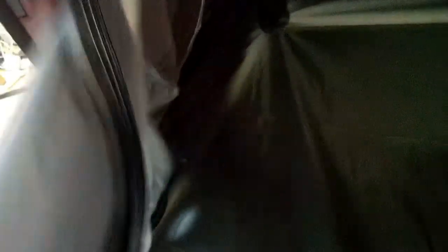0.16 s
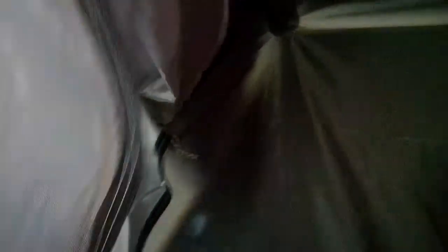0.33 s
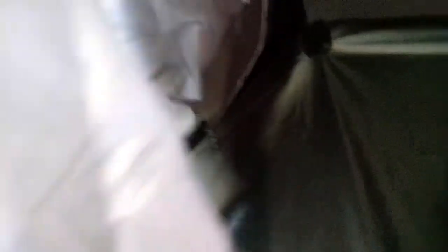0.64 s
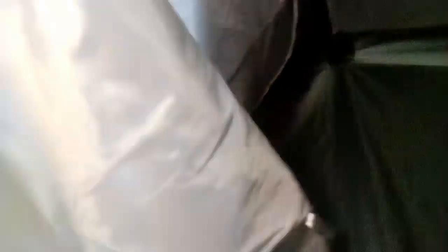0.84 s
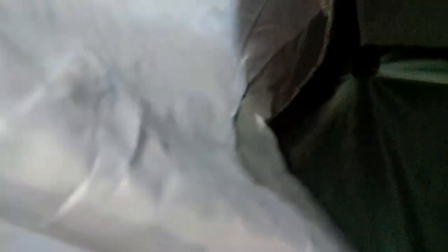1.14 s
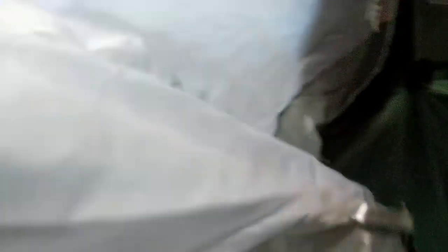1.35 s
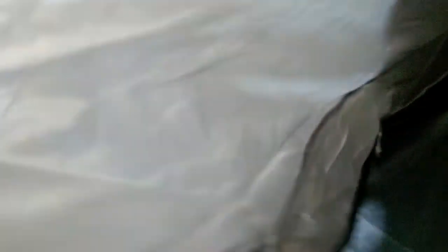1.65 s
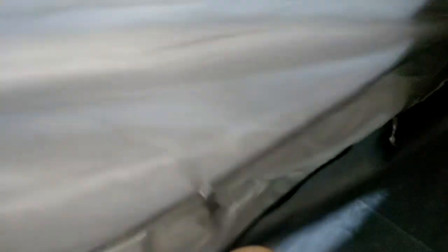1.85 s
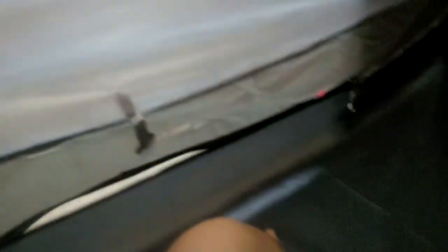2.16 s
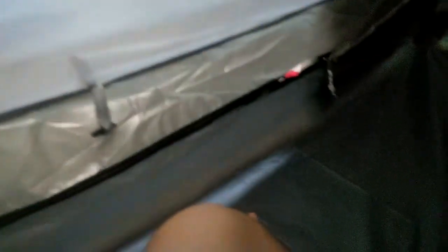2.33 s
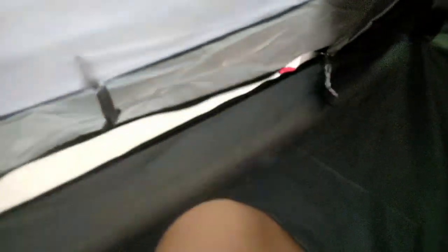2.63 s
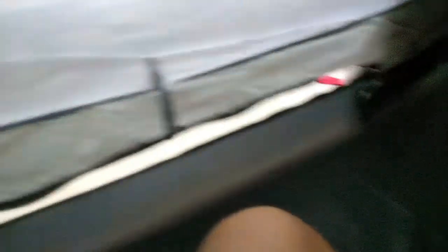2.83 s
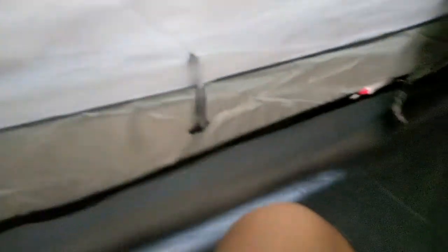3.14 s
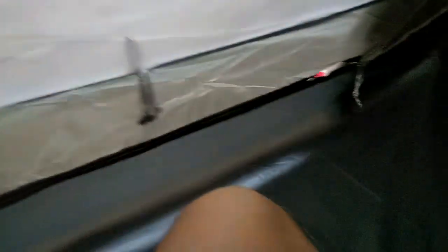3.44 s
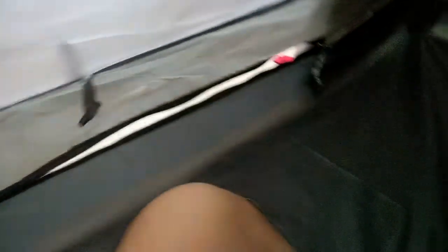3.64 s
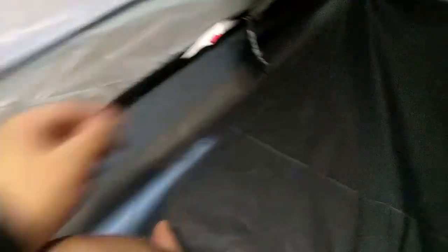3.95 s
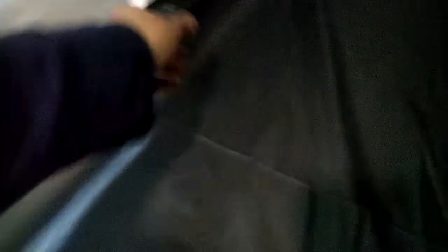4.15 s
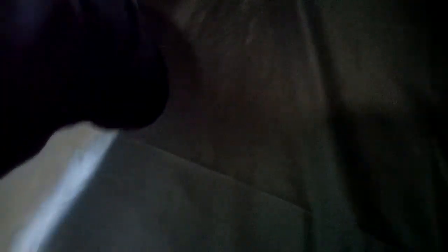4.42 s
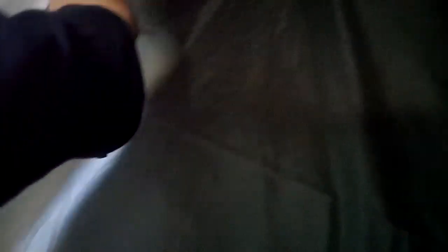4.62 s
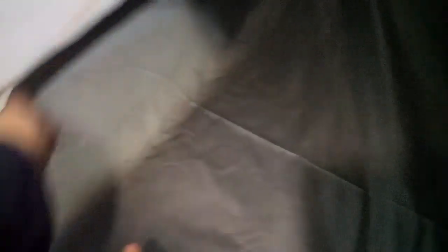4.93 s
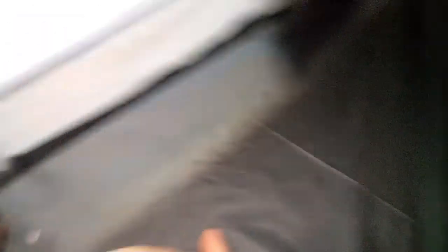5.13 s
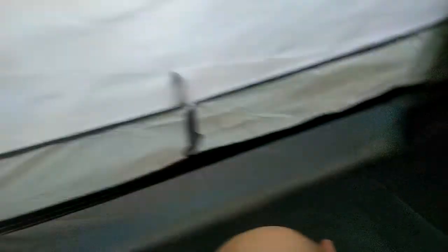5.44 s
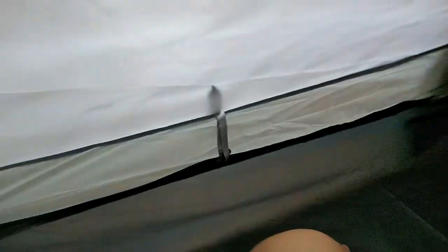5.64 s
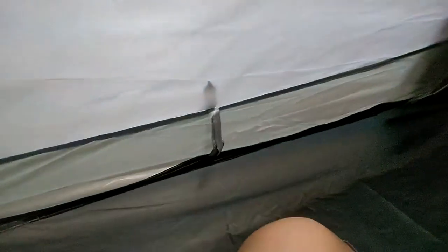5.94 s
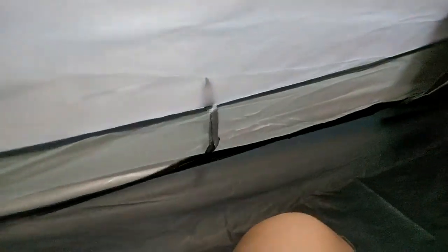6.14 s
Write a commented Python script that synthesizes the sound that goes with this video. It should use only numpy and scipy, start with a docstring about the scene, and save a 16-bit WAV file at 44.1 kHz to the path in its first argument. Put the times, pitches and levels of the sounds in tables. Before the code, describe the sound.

Close buzzing tent zip: a long wavering pull, a few fabric rustles and snaps, then a second quicker pull that slows to separate clicks.

```python
"""A nylon tent door is unzipped close by in two long rasping runs, with a few short tugs between and around them.
Inside the tent, near a phone microphone, each tooth under the slider clicks, scrapes and flexes the taut cloth.
The metal pull tab jingles, the tape snaps, and the last teeth let go one by one.
The loose door rustles softly during the first run, and a quiet outdoor background lies beneath."""
import sys
import numpy as np
from scipy import signal
from scipy.fft import rfft, irfft
from scipy.io import wavfile
from scipy.ndimage import uniform_filter1d, map_coordinates

SR = 44100
rng = np.random.default_rng(int(sys.argv[2]) if len(sys.argv) > 2 else 0)


def put_to_file(sound):
    """Save the sound as 16-bit audio at rate SR, in the file named by the first command-line argument."""
    columns = np.atleast_2d(sound).T  # one column per channel
    safe = np.clip(columns, -1, 1)
    whole_steps = np.round(safe * 32767)
    wavfile.write(sys.argv[1], SR, whole_steps.astype(np.int16))


N = 276992
T = np.arange(N) / SR

# The slider's first long pull. Each row: time in seconds, teeth per second in Hz, drive in dB.
FIRST_PULL = [(0.03, 97.6, -52.5), (0.15, 116.3, -49), (0.26, 270.1, -38.5), (0.3, 342.7, -38),
              (0.43, 409.6, -39.5), (0.53, 345.3, -37), (0.56, 432.3, -41), (0.595, 465, -36.5),
              (0.66, 579, -37.5), (0.77, 401, -43), (0.86, 349.4, -38), (0.93, 443.6, -40),
              (1.1, 441.7, -39), (1.25, 373, -46), (1.43, 504.6, -44.5), (1.59, 419, -45),
              (1.72, 259.8, -47), (1.79, 712, -42), (1.9, 880, -39.5), (1.942, 680, -47),
              (1.96, 739.5, -39.5), (2.04, 402.5, -48.5), (2.26, 423.8, -45.5), (2.37, 291.3, -47),
              (2.44, 252.7, -63)]
# Colour of its teeth. Each row: frequency in Hz, relative gain in dB.
FIRST_RASP = [(200, -3.5), (600, 16), (1400, 7), (2700, 4.5), (4600, 7), (6100, 2.5), (7300, -1),
              (8100, -6), (9800, 0), (12000, -15.5), (14000, -9)]
# How the taut cloth answers a push. Each row: frequency in Hz, relative gain in dB.
FIRST_CLOTH = [(120, 6), (280, 4), (350, 5), (420, -3), (540, -11.5), (790, -8.5), (1050, -15.5),
               (1550, -0.5), (1800, -14.5)]
# The tape beside the slider resonates as its tension and free length change.
# Each row: time in seconds, centre in Hz, level over the drive in dB.
FIRST_TAPE = [(0.35, 1190, -7.5), (0.67, 2000, -7), (0.85, 1180, -9.5), (1.15, 1597, -8), (1.48, 1650, -5),
              (1.86, 2040, -15.5), (2.05, 1400, -4.5), (2.3, 1090, -5.5)]
# How unevenly the teeth pass, fraying at the end. Each row: time in seconds, share of a tooth period.
FIRST_UNEVEN = [(1.2, .02), (1.45, .012), (1.9, .016), (2.3, .042)]


def first_run():
    """The longer pull, whose teeth scrape for longer over a strongly swinging cloth."""
    return zip_run(FIRST_PULL, FIRST_RASP, FIRST_CLOTH, [FIRST_TAPE], FIRST_UNEVEN, scrape_s=0.011,
                   rasp_db=1, panel_db=1.0, swing_db=1.5, octave_db=3.5)


# The slider's second long pull. Each row: time in seconds, teeth per second in Hz, drive in dB.
SECOND_PULL = [(4.68, 198.4, -28.5), (4.716, 290.4, -43), (4.772, 360, -41), (4.824, 437.3, -40.5),
               (4.875, 473.6, -42), (4.998, 651.6, -38), (5.074, 645, -39.5), (5.19, 751, -39.5),
               (5.34, 662, -40.5), (5.47, 645.3, -38), (5.535, 598.6, -46), (5.595, 270.9, -45.5),
               (5.65, 213.5, -46.5), (5.722, 166.2, -42.5), (5.765, 90, -45), (5.84, 88.45, -48.5)]
# Colour of its teeth. Each row: frequency in Hz, relative gain in dB.
SECOND_RASP = [(200, 10.5), (900, 10), (1400, 6.5), (2000, 5), (2900, 5.5), (4800, 2.5), (6000, -4.5),
               (7200, -9), (8200, -28), (9800, -12), (12000, -16.5)]
# How the taut cloth answers a push. Each row: frequency in Hz, relative gain in dB.
SECOND_CLOTH = [(90, 5.5), (180, 2), (400, 10), (490, 1), (640, -2.5), (780, -13.5), (1100, -34),
                (1300, -6), (1520, -8.5)]
# Resonance of the tape. Each row: time in seconds, centre in Hz, level over the drive in dB.
SECOND_TAPE = [(4.8, 1330, -9), (5.25, 1580, -8.5), (5.47, 1713, 2), (5.62, 1405, -9.5)]
# The slider body rings, most at full speed. Each row: time in seconds, centre in Hz, level over the drive in dB.
SLIDER_BODY = [(4.95, 4570, -3.5), (5.23, 4120, 1), (5.55, 4640, -10.5)]
# How unevenly the teeth pass, settling down. Each row: time in seconds, share of a tooth period.
SECOND_UNEVEN = [(4.85, .032), (5.25, .018)]


def second_run():
    """The shorter pull, with brief scrapes and the slider body ringing."""
    return zip_run(SECOND_PULL, SECOND_RASP, SECOND_CLOTH, [SECOND_TAPE, SLIDER_BODY], SECOND_UNEVEN,
                   scrape_s=0.0031, rasp_db=0.5, panel_db=5.5, swing_db=1.0, octave_db=-2.5)


CLICKING_HZ = 335  # above this tooth rate clean clicks take over from scraping
# Modes of the stretched door panel. Each row: frequency in Hz, 60 dB decay in seconds, relative level in dB.
PANEL_MODES = [(99.3, 0.17, 2.5), (183, 0.14, -4.5), (247.6, 0.15, 6), (340, 0.14, 6), (572, 0.041, -5)]


def zip_run(pull, rasp_colour, cloth, resonances, unevenness, scrape_s, rasp_db, panel_db, swing_db, octave_db):
    """One pull of the slider: a click and a scrape per tooth, and the cloth swinging at the tooth rate."""
    hz = curve(pull)
    at_rate, at_octave = answer(hz, cloth), answer(2 * hz, cloth)
    scrape_share = 1 / (1 + (hz / CLICKING_HZ) ** 2)

    # a slow slider sticks and slips, a fast one runs evenly
    slow = 1 / (1 + (hz / 275) ** 4)
    uneven = curve(unevenness)
    fast_wander = (uneven + .1 * slow ** 1.5) * walk(210)
    slow_wander = .45 * uneven * walk(45)
    hz = hz * np.exp(fast_wander + slow_wander)

    # one tooth each time the phase passes a whole number, a little early or late
    phase = np.cumsum(hz) / SR
    tooth = np.arange(1, int(phase[-1]))
    times = np.interp(tooth, phase, T)
    chance = rng.standard_normal((len(times), 2))
    late = np.interp(times, T, uneven + .06 * slow) * chance[:, 0]
    sizes = undb(2.4 * chance[:, 1]) / np.sqrt(np.interp(times, T, hz))
    teeth = impulses(np.interp(tooth + late, phase, T), sizes)

    # the hard clicks are bright; the scraping carries the low end and takes over at low speed
    reflected = folds(teeth, reach_s=.006, drift_s=.00022)
    clicks = steady(colour(reflected, [(500, -14), (1200, 0), (9000, 0)]))
    rub = unit(scrape(teeth, scrape_s))
    mixed = np.sqrt(1 - scrape_share) * clicks + np.sqrt(scrape_share) * rub
    rasp = undb(rasp_db) * unit(colour(mixed, rasp_colour))
    buzz = sum(resonate(clicks, rows) for rows in resonances)
    # slow teeth shake the whole panel
    panel = undb(panel_db) * slow * unit(ring(rub, PANEL_MODES))
    force = swell(pull) * undb(.8 * walk(45))

    # the cloth swings at the tooth rate and at twice that rate
    flutter = undb(swing_db + 3 * walk(110))
    first = swell(pull) * at_rate * tautness(axis=2) * flutter * np.sin(2 * np.pi * phase)
    octave_flutter = undb(octave_db + 4.0 * walk(70))
    second = swell(pull) * at_octave * tautness(axis=3) * octave_flutter * np.sin(4 * np.pi * phase)
    # slow teeth swing the cloth less
    swing = np.sqrt(2) * (1 - 0.57 * slow) * (first + second)
    return force * (rasp + buzz + panel) + swing


RUN_ATTACK_S, RUN_RELEASE_S = 0.035, 0.0087  # gain ramps at the two ends of a run


def swell(rows):
    """Gain from the slider's drive column, ramped at both ends and silent outside the run."""
    gate = np.minimum((T - rows[0][0]) / RUN_ATTACK_S, (rows[-1][0] - T) / RUN_RELEASE_S)
    return undb(curve(rows, axis=2)) * np.clip(gate, 0, 1)


def answer(hz, cloth):
    """Gain of the cloth when it is pushed at this frequency."""
    points_hz, db = np.transpose(cloth)
    return undb(np.interp(np.log(hz), np.log(points_hz), db))


# The door pulls taut for a moment and drones, at the tooth rate, at twice that rate, or both.
# Each row: time in seconds, half length in seconds, change of swing at the tooth rate in dB,
# change at twice that rate in dB.
TAUT_MOMENTS = [(0.285, 0.031, 5.5, 7), (0.452, 0.097, -11, 11), (0.866, 0.039, 12.5, 4.5),
                (1.85, 0.015, -24, 10), (1.96, .022, 1, 7), (2.089, 0.053, 7.5, 3.5),
                (2.222, 0.043, 6.5, 7.5), (4.827, 0.022, 6, 11), (5.069, 0.043, 5, 13.5),
                (5.204, 0.034, 4, 21)]


def tautness(axis):
    """Change of the cloth's swing, from one dB column, while the door is pulled taut."""
    return undb(sum(row[axis] * np.exp(-((T - row[0]) / row[1]) ** 2) for row in TAUT_MOMENTS))


TAPE_WIDTH = 0.33  # half width of a resonance, as a share of its centre


def resonate(x, rows):
    """A broad resonance whose centre and strength follow a curve."""
    # resample to 32 steps per cycle of the centre, so that one fixed filter follows it
    turn = np.cumsum(curve(rows)) / SR
    even = np.arange(0, turn[-1], 1 / 32)
    b, a = signal.iirpeak(1, .5 / TAPE_WIDTH, fs=32)
    once = signal.lfilter(b, a, np.interp(even, turn, x))
    rung = signal.lfilter(b, a, once)
    return undb(curve(rows, axis=2)) * steady(np.interp(turn, even, rung))


# The last teeth let go one by one. Each row: time in seconds, relative strength in dB.
FINAL_CLICKS = [(5.847, -29), (5.871, -33.5), (5.9001, -34.5), (5.933, -33), (5.9486, -30), (5.9789, -29),
                (5.9895, -30), (6.0059, -29), (6.0262, -36), (6.0485, -30.5), (6.0671, -34),
                (6.0938, -32.5), (6.139, -32.5)]


def last_teeth():
    """The slider creeps to a halt: each tooth clicks sharply and rumbles the panel, most in its lowest mode."""
    s, db = np.transpose(FINAL_CLICKS)
    clicks = impulses(s, undb(db))
    grit = .9 * clicks + 1.1 * scrape(clicks, .0016)
    upper_panel = undb(-18.5) * ring(clicks, PANEL_MODES[1:])
    lowest_panel = undb(-14.5) * ring(clicks, PANEL_MODES[:1])
    return undb(9.0) * colour(grit, SECOND_RASP) + upper_panel + lowest_panel


# Colour of the nylon hiss. Each row: frequency in Hz, relative gain in dB.
NYLON_HISS = [(1300, 5.5), (3000, 3.5), (5000, 9.5), (7200, 1), (8000, -10.5), (10000, -1.5),
              (14000, -24.5)]
# Colour of the duller cloth body. Each row: frequency in Hz, relative gain in dB.
CLOTH_BODY = [(250, 9), (700, 5), (1300, 4), (2500, -4), (6000, -17.5)]


def tugs():
    """The slider catches and the nylon rubs: dense irregular grains, bright on the weave, dull in the panel."""
    rub = scrape(grains(1700, 3.4), .0012)
    hiss = undb(2.0) * unit(colour(rub, NYLON_HISS)) * tug_gain(axis=3)
    body = undb(3.0) * unit(colour(rub, CLOTH_BODY)) * tug_gain(axis=4)
    return hiss + body


TUG_DEPTH_DB, TUG_RELEASE_S = 15.5, 0.028  # a tug swells by this much, and falls as far in the release time
# Short tugs and shifts of grip on the nylon. Each row: start in seconds, attack in seconds, hold in seconds,
# then relative levels in dB of the nylon hiss, the cloth body and the pull tab.
GRIP_TUGS = [(2.812, 0.018, 0.047, -47, -48.5, -47), (2.936, .15, 0.037, -56, -47, -51),
             (3.367, 0.039, .016, -56, -65, -64), (3.56, 0.063, 0.043, -43, -50, -56),
             (3.696, 0.016, 0.016, -47, -58, -57), (4.326, 0.094, 0.1, -58.5, -60.5, -69),
             (4.673, 0.027, 0.15, -50, -43.5, -77), (5.93, 0.031, 0.1, -61, -57.5, -61.5)]


def tug_gain(axis):
    """Gain from one dB column of the tugs: every tug swells, holds and lets go."""
    gain = 0
    for row in GRIP_TUGS:
        age, attack, hold = T - row[0], row[1], row[2]
        rise = np.maximum(1 - age / attack, 0)
        fall = np.maximum(age - attack - hold, 0) / TUG_RELEASE_S
        gain = gain + (age > 0) * undb(row[axis] - TUG_DEPTH_DB * (rise + fall))
    return gain


# Snaps of the tape. Each row: time in seconds, relative strength of the crack in dB, of the cloth thump in dB.
TAPE_SNAPS = [(0.035, -41, -51), (0.9215, -15, -48), (1.957, -23, -42), (3.562, -21, -57),
              (4.0562, -30, -45), (4.37, -35, -52), (4.496, -21, -60), (4.843, -26, -37)]


def snaps():
    """The tape jerks free: a dry crack on the weave, while the panel knocks and thumps."""
    s, db, thump_db = np.transpose(TAPE_SNAPS)
    clicks, pushes = impulses(s, undb(db)), impulses(s, undb(thump_db))
    crack = colour(clicks + undb(-5) * scrape(clicks, .005), NYLON_HISS)
    knock = colour(pushes + undb(9.5) * scrape(pushes, 0.0054), CLOTH_BODY)
    thump = ring(pushes, PANEL_MODES)
    return crack + undb(24.5) * knock + undb(-7.5) * thump


# Modes of the metal pull tab. Each row: frequency in Hz, 60 dB decay in seconds, relative level in dB.
TAB_MODES = [(7010, .04, 0), (7190, .02, -3), (8940, .035, -12)]
# Harder knocks of the tab on the slider. Each row: time in seconds, relative strength in dB.
TAB_KNOCKS = [(0.2623, -40.5), (0.55, -40), (0.89, -40), (2.835, -43), (4.495, -45), (4.88, -48.5),
              (5.985, -56)]


def pull_tab():
    """The tab chatters as the slider moves and rings at harder knocks; gentle tugs stir only its lowest modes."""
    shake = undb(-6) * swell(FIRST_PULL) + undb(-12.5) * swell(SECOND_PULL)
    rattle = grains(700, 3) * undb(2.5 * walk(22))
    run_chatter = shake * unit(ring(rattle, TAB_MODES))
    tug_chatter = tug_gain(axis=5) * unit(ring(rattle, TAB_MODES[:2]))
    s, db = np.transpose(TAB_KNOCKS)
    knocks = ring(scrape(impulses(s, undb(db)), 0.0092), TAB_MODES)
    return run_chatter + tug_chatter + undb(13) * knocks


# The loose door billows. Each row: time in seconds, half length in seconds, half of the rise in dB.
DOOR_BILLOWS = [(0.831, 0.034, 8.5), (1.88, .11, 2)]


def flapping():
    """The loose door sways and rumbles softly during the first run, more where it billows."""
    half_rise_db = sum(db * np.exp(-((T - s) / half) ** 2) for s, half, db in DOOR_BILLOWS)
    effort = np.sqrt(swell(FIRST_PULL) * curve(FIRST_PULL) / 500) * undb(2 * half_rise_db)
    sway = colour(rng.standard_normal(N), [(66, -0.5), (90, -14.5), (250, -15.0), (2000, -40.5)])
    return undb(-33.5) * effort * unit(sway) * undb(2 * walk(9.34))


OUTSIDE_DB = -57  # middle level of the background
# Colour of the outdoor background. Each row: frequency in Hz, relative gain in dB.
OUTSIDE_COLOUR = [(40, -12.5), (70, -1), (130, -9), (390, -16), (1100, -22), (4100, -27.5), (8200, -34),
                  (14000, -38)]


def outside():
    """Quiet outdoor background through the tent wall: coloured noise with a slightly wavering level."""
    return undb(OUTSIDE_DB + 0.23 * walk(54)) * unit(colour(rng.standard_normal(N), OUTSIDE_COLOUR))


def folds(x, reach_s, drift_s, count=6):
    """Reflections from moving folds of cloth: short paths whose lengths keep changing."""
    lags = reach_s * (np.arange(count) + rng.random(count)) / count
    paths = ((-1) ** k * np.interp(T - lag - drift_s * walk(6), T, x) for k, lag in enumerate(lags))
    return sum(paths) / np.sqrt(count)


def scrape(clicks, decay_s):
    """A burst of friction noise that swells and fades at each click, with the click's energy."""
    keep = np.exp(-2 / (decay_s * SR))
    fading = signal.lfilter([1 - keep], [1, -keep], clicks ** 2)
    energy = uniform_filter1d(fading, size=48)
    return np.sqrt(np.abs(energy)) * rng.standard_normal(N)


def grains(rate, spread_db):
    """Random tiny contacts of uneven size, `rate` a second on average."""
    return (rng.random(N) < rate / SR) * undb(spread_db * rng.standard_normal(N))


def impulses(times, sizes):
    """Clicks, each shared between two samples to fall at its exact time."""
    out, at = np.zeros(N), np.clip(times * SR, 0, N - 2)
    whole = at.astype(int)
    np.add.at(out, whole, sizes * (1 - at + whole))
    np.add.at(out, whole + 1, sizes * (at - whole))
    return out


def ring(x, modes):
    """Drive a set of decaying sine modes."""
    t = T[:SR // 2]
    response = 0
    for hz, t60, db in modes:
        decay = np.exp(-np.log(1000) * t / t60)
        response = response + undb(db) * decay * np.sin(2 * np.pi * hz * t)
    return signal.fftconvolve(x, response)[:N]


def colour(x, points):
    """Causal minimum-phase filter through the given (Hz, dB) points, falling away below the first."""
    hz, db = np.transpose(points)
    grid = np.maximum(np.fft.rfftfreq(4096, 1 / SR), 1)
    below = np.minimum(grid / hz[0], 1) ** 2
    gain = below * undb(np.interp(np.log(grid), np.log(hz), db))
    # folding the cepstrum onto positive times makes the response causal
    cepstrum = irfft(np.log(gain))
    fold = 1 + np.sign(np.fft.fftfreq(len(cepstrum)))
    response = irfft(np.exp(rfft(cepstrum * fold)))
    return signal.fftconvolve(x, response)[:N]


def steady(x):
    """Even out the level over a few tens of milliseconds, keeping the grain."""
    return x / np.sqrt(np.abs(uniform_filter1d(x ** 2, size=1800)) + 1e-12)


def walk(rate):
    """Smooth chance that changes `rate` times a second; rms 1."""
    steps = rng.standard_normal(N)
    return unit(map_coordinates(steps, [T * rate], order=1))


def curve(rows, axis=1):
    """One column of a table, joined by straight lines in time."""
    rows = np.array(rows)
    return np.interp(T, rows[:, 0], rows[:, axis])


def unit(x):
    """Scale to rms 1."""
    return x / np.sqrt(np.mean(x ** 2) + 1e-18)


def undb(db):
    """Decibels to gain."""
    return 10 ** (np.asarray(db) / 20)


def scene():
    """All sources in the tent, with reflections off its walls; only the treble differs between left and right."""
    zipper = first_run() + second_run() + last_teeth()
    near = zipper + tugs() + snaps() + pull_tab() + flapping()
    walls = undb(-12) * folds(near, reach_s=.014, drift_s=.0004)
    mid = near + walls + outside()
    spread = folds(mid, reach_s=.003, drift_s=0.000376)
    side = colour(spread, [(2000, -73), (4000, -58.0), (6000, -21.5), (9000, -7.0), (13000, -4.0)])
    return np.array([mid + side, mid - side])


def record(dry):
    """The phone drops the deep bass below 46 Hz and cuts the top steeply above 14350 Hz."""
    thin = signal.sosfilt(signal.butter(4, 46, "high", fs=SR, output="sos"), dry)
    return signal.sosfilt(signal.ellip(12, .2, 70, 14350, fs=SR, output="sos"), thin)


dry = scene()
out = record(dry)
put_to_file(out)
```